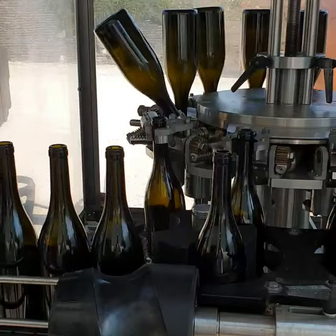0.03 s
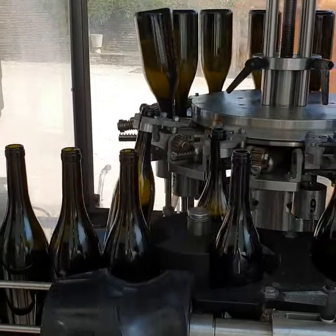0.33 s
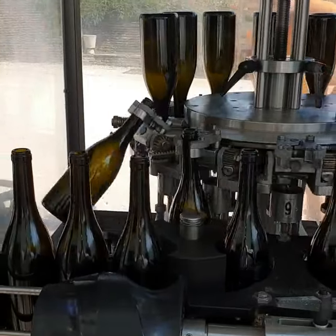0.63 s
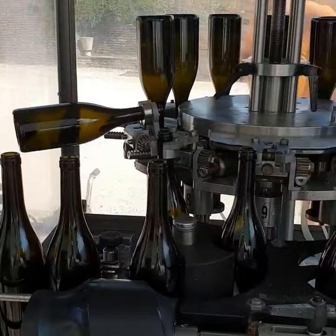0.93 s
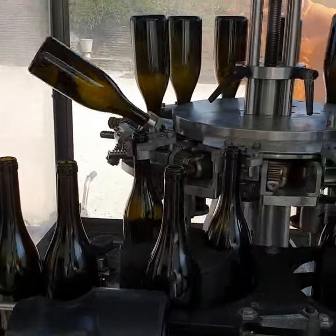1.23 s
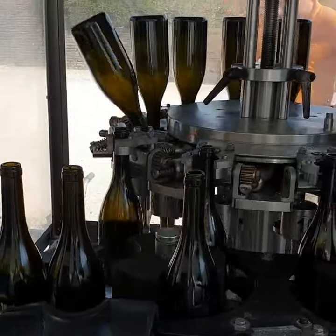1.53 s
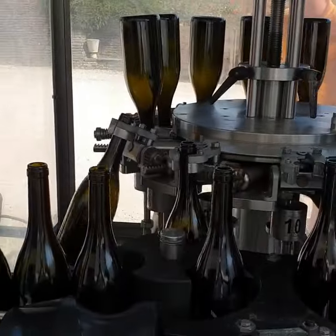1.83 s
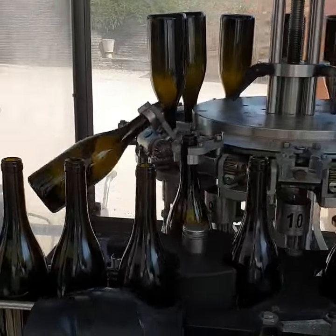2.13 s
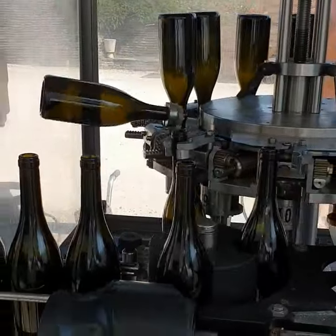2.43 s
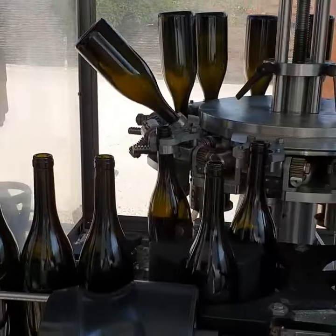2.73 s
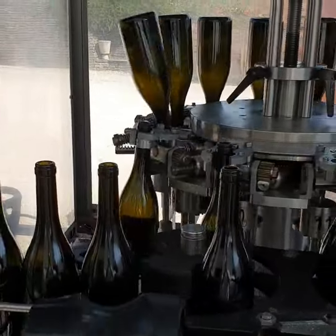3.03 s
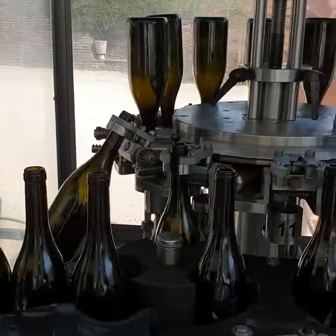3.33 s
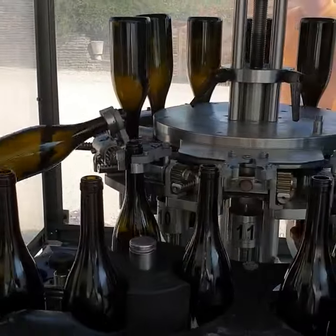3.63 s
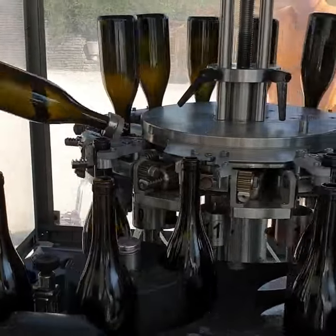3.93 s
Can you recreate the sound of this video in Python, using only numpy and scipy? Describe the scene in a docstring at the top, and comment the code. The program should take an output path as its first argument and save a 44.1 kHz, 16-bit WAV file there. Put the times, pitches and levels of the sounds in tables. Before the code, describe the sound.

Empty glass bottles clink and clatter close by over a rumbling washing machine and its rattling, hissing conveyor. Low thuds and steel clacks open, with a dense flurry of ringing clinks from 0.3 to 1 second. It then quietens to scattered clinks and brief squeaks. The rattle surges at 2.3 seconds, sharp knocks and clinks cluster around 2.8 to 3, and lighter clacks and clinks follow, echoing briefly.

```python
"""A hard-walled winery hall, where a rotary bottle rinser turns.
The bed is the machine: the drive rumbles, the conveyor rattles and hisses, all from swarms of
tiny contacts. Over it the frame thuds, bottles knock in the guides and steel grippers clack, each
a burst of shaped noise, and rubbed glass and steel chirp. Up front, empty bottles jostle and
clink, ringing in their glass modes. The walls put a short tail on the hits."""
import sys
import numpy as np
from scipy import signal
from scipy.fft import rfft, irfft
from scipy.io import wavfile

SR = 44100
rng = np.random.default_rng(int(sys.argv[2]) if len(sys.argv) > 2 else 0)


def inscribe(sig):
    """Save sig as 16-bit PCM at rate SR to the path in sys.argv[1].

    A 1-D sig is mono; a 2-D sig holds one channel per row.
    Samples are clipped to [-1, 1] before scaling.
    """
    pcm = np.round(np.clip(np.atleast_2d(sig).T, -1, 1) * 32767)
    wavfile.write(sys.argv[1], SR, pcm.astype(np.int16))


N = 176400
T = np.arange(N) / SR
BIN_HZ = np.arange(N // 2 + 1) * SR / N


def from_db(db):
    """Decibels to gain."""
    return 10 ** (np.asarray(db) / 20)


def rms_one(x):
    """Scale to unit power."""
    return x / np.sqrt(np.mean(x ** 2) + 1e-20)


def fader(points):
    """Gain ride through (t/s, level/dB) points."""
    return from_db(np.interp(T, *np.transpose(points)))


def curve(points):
    """Draw (f/Hz, value) points across the spectrum on a log-frequency axis."""
    hz, values = np.transpose(points)
    return np.interp(np.log(BIN_HZ + 1e-9), np.log(hz), values)


def decay(s, t60, attack_s):
    """Envelope of a blow at time s: quick rise, exponential fall."""
    age = np.clip(T - s, 0, 2)
    return (1 - np.exp(-age / attack_s)) * np.exp(-np.log(1000) * age / t60)


# Stereo width of the hall, mono in the lows: f/Hz, left-right correlation
CORRELATION = [(150,1),(700,0.71),(1400,0.033),(2800,0.22),(6000,0.014)]
# Stereo balance: f/Hz, level of left over right/dB
BALANCE = [(600,1.9),(2500,-0.5),(8000,2.2)]

def coloured(pair, eq):
    """Give two unrelated signals an EQ and the stereo image of the hall; rms 1."""
    mid, side = rfft(pair)
    alike = np.clip(curve(CORRELATION), -.99, .99)
    signs = np.array([[1], [-1]])
    image = np.sqrt(1 + alike) * mid + signs * np.sqrt(1 - alike) * side
    image *= from_db(signs * curve(BALANCE) / 2)
    return rms_one(irfft(image * from_db(curve(eq)), N))


def blows(cues, eq, t60, attack_s):
    """Hits at (t/s, level/dB) on a body whose modes are too dense to tell apart."""
    power = sum((from_db(db) * decay(s, t60, attack_s)) ** 2 for s, db in cues)
    return noise_burst_colour(eq) * np.sqrt(power)


def noise_burst_colour(eq):
    """Steady stereo noise through an EQ, ready for an envelope."""
    return coloured(rng.standard_normal((2, N)), eq)


def ring(times, strikes, hz, t60):
    """One resonant mode; each complex strike sets the strength and phase of its ring."""
    pole = np.exp((2j * np.pi * hz - np.log(1000) / t60) / SR)
    force = np.full(N, 1e-18)
    at = np.clip(times * SR, 0, N - 2).astype(int)
    np.add.at(force, at, strikes.real)
    np.add.at(force, at + 1, -(strikes * pole.conjugate()).real)
    return signal.lfilter([1], [1, -2 * pole.real, abs(pole) ** 2], force)


def rattle(eq, per_s=300, parts=6, t60=0.079, spread_db=3, close_share=0.83):
    """Many small contacts on a few short-ringing parts, over a wash of far ones; rms 1."""
    age, close = T[:SR // 10], 0
    for _ in range(parts):
        sizes = from_db(spread_db * np.minimum(rng.exponential(1, N), 3.5)) * rng.choice([-1, 1], N)
        clicks = sizes * (rng.random(N) < per_s / parts / SR)
        body = rng.standard_normal((2, len(age))) * np.exp(-np.log(1000) * age / t60)
        close += signal.oaconvolve(clicks[None], body, axes=1)[:, :N]
    wash = rng.standard_normal((2, N))
    return coloured(np.sqrt(close_share) * rms_one(close) + np.sqrt(1 - close_share) * wash, eq)


def taps(per_s, low_hz, high_hz, t60, spread_db, count):
    """Parts tapped at random, each with a short ring of its own pitch; high ones sound wider."""
    out = np.zeros((2, N))
    full_width_hz = 2512
    for hz in np.geomspace(low_hz, high_hz, count):
        times = T[rng.random(N) < per_s / count / SR]
        turn, apart, luck = rng.uniform(-1.02, 1, size=(3, len(times)))
        pitch = hz * (1 + rng.uniform(-0.9, 1) / count)
        width_rad = 2 * min(hz / full_width_hz, 1)
        for ear, side in enumerate((-1, 1)):
            phase = np.pi * turn + side * apart * width_rad
            out[ear] += ring(times, from_db(spread_db * luck) * np.exp(1j * phase), pitch, t60)
    return out


def jingle(eq):
    """A cloud of short glassy tones at scattered pitches; rms 1."""
    tones = taps(per_s=450, low_hz=2710, high_hz=15450, t60=0.051, spread_db=6, count=64)
    return rms_one(irfft(rfft(tones) * from_db(curve(eq)), N))


def hall(x, predelay_s=0.0079):
    """Diffuse reverb tail from the hard walls."""
    tail = (rng.standard_normal((2, N)) * decay(predelay_s, t60=0.41, attack_s=0.0017))[:, :SR]
    tail /= np.sqrt(np.sum(tail ** 2) / 2)
    return signal.fftconvolve(x, tail, axes=1)[:, :N]


# Fader ride of the drive: t/s, level/dB
DRIVE_RIDE = [(.07,-33.5),(.33,-34),(.5,-37),(1.2,-43),(1.65,-40),(2.17,-41),(2.3,-35.5),(4,-36)]
# Its low, heavy EQ: f/Hz, level/dB
DRIVE_EQ = [(24,-39),(45,-6.5),(62,-6.5),(110,-3),(160,-4),(200,5.5),(245,1.5),(293,3.5),(400,-4),(600,-20),(1500,-32)]

def drive_rumble():
    """The bottom of the bed: dense contacts in the drive blur into a rumble."""
    return fader(DRIVE_RIDE) * rattle(DRIVE_EQ)


# Fader ride of the hiss: t/s, level/dB
HISS_RIDE = [(.07,-33),(.35,-31),(1.02,-33.5),(1.15,-43),(1.35,-47.5),(1.63,-39.5),(2.02,-42.5),(2.23,-41.5),(2.3,-35.5),(2.6,-40),(2.68,-31.5),(2.93,-39.5),(3.08,-34.5),(3.6,-37),(3.71,-32),(4,-42.5)]
# Its bright EQ: f/Hz, level/dB
HISS_EQ = [(1500,-3.5),(2700,12.5),(3400,12),(4600,11.5),(5600,-2),(7300,1.5),(9000,-6.5),(10700,-2),(12700,-15),(16000,-54)]

def conveyor_hiss():
    """The top of the bed: a fine rattle blended with the jingle of far bottles."""
    return fader(HISS_RIDE) * (rattle(HISS_EQ) + jingle(HISS_EQ))


# The rattle surges as the turret turns: t/s, level/dB
CONVEYOR_RIDE = [(.14,-30.5),(.18,-22.5),(.4,-31.5),(1.02,-28.5),(1.1,-36),(1.35,-38.5),(1.62,-32),(1.85,-36),(2.15,-36),(2.33,-22.5),(2.56,-28),(2.67,-26.5),(2.92,-33.5),(3,-23.5),(3.15,-30),(3.6,-31),(3.71,-22),(3.94,-28)]
# Its mid-forward EQ: f/Hz, level/dB
CONVEYOR_EQ = [(200,-23.5),(400,-7.5),(520,-6.5),(785,2.5),(1150,-2),(1700,-4.5),(1950,-6),(2200,-7),(3500,-9),(7000,-27.5),(16000,-58)]

def conveyor_rattle():
    """The middle of the bed: the conveyor clatters and its loose parts ring."""
    loose_parts = taps(per_s=170, low_hz=337.8, high_hz=2512, t60=0.069, spread_db=3, count=32)
    return fader(CONVEYOR_RIDE) * (rattle(CONVEYOR_EQ) + from_db(-3.5) * loose_parts)


# Blows to the frame: t/s, level/dB
THUD_CUES = [(.115,-28.5),(.213,-22),(.295,-28),(.36,-33.5),(.658,-26.5)]
# Their boomy EQ: f/Hz, level/dB
THUD_EQ = [(30,-42),(90,-1.5),(180,5),(320,2),(600,-8),(3000,-54)]

def frame_thuds():
    """The frame answers a blow with a short, low thud."""
    return blows(THUD_CUES, THUD_EQ, t60=0.18, attack_s=0.0014)


# Bottles hitting the guides: t/s, body level/dB, crack level/dB
KNOCK_CUES = [(0.299,-22,-19),(.608,-20,-34),(.64,-28,-20),(0.877,-27.5,-19),(1.0,-27.5,-14.5),(1.398,-30,-27.5),(1.489,-36,-23),(2.503,-24,-29),(2.752,-23,-31),(2.789,-19,-16),(2.804,-17,-16),(2.842,-20.5,-32),(3.017,-21,-31)]
# EQs of the body and of the crack: f/Hz, level/dB
BODY_EQ = [(50,-26),(220,-15),(450,-11),(800,4),(1200,-3),(2000,-10),(16000,-46)]
CRACK_EQ = [(400,-27),(1000,-1),(1600,4),(2500,0.5),(3500,-4),(16000,-50)]

def guide_knocks():
    """A bottle knocks in the guides: a dull body layered with a dry crack."""
    times, body_db, crack_db = np.transpose(KNOCK_CUES)
    body = blows(zip(times, body_db), BODY_EQ, t60=0.11, attack_s=0.00053)
    crack = blows(zip(times, crack_db), CRACK_EQ, t60=0.096, attack_s=0.00064)
    return body + crack


# Gripper snaps: t/s, level/dB
GRIPPER_CUES = [(.157,-20),(.288,-18.5),(.378,-19),(.779,-22),(1.566,-24),(1.898,-26),(2.047,-23.5),(2.973,-18),(3.024,-16),(3.304,-21.5),(3.468,-18)]
# Their hard, steely EQ: f/Hz, level/dB
GRIPPER_EQ = [(100,-10),(900,-7.5),(2400,0.5),(3000,-5.5),(3900,8),(4800,0),(5700,-8.5),(7500,-13),(12800,-12.5),(16000,-22)]

def gripper_clacks():
    """Steel grippers snap, setting off a dense cluster of modes."""
    return blows(GRIPPER_CUES, GRIPPER_EQ, t60=0.2, attack_s=0.0014)


# Brief tones of glass and metal: t/s, f/Hz, level/dB, t60/s
CHIRP_CUES = [(.6,3360,-13.5,.093),(1.487,1970,-22,0.052),(1.719,2980,-21.5,0.22),(1.765,7203,-31,0.11),(2.275,12600,-36,0.15),(2.425,10730,-34.5,0.21),(2.852,6340,-26.5,0.13),(2.865,3340,-18,0.27),(3.17,7122,-32.5,.16)]

def chirps(flutter_hz=90, flutter_rad=0.5):
    """Rubbed glass and steel sing single tones, roughened by a flutter in phase."""
    out = np.zeros((2, N))
    lowpass = signal.butter(2, flutter_hz, fs=SR, output="sos")
    for s, hz, db, t60 in CHIRP_CUES:
        flutter = rms_one(signal.sosfilt(lowpass, rng.standard_normal((2, N))))
        tone = np.sin(2 * np.pi * hz * T + flutter_rad * flutter)
        out += from_db(db) * decay(s, t60, attack_s=0.002) * tone
    return out


# Bottle meets bottle: t/s, low ring level/dB, treble level/dB
CLINK_CUES = [(0.299,-23.5,-46),(0.375,-17,-23),(.391,-23,-18.5),(.415,-16,-23.5),(.451,-16.5,-24),(.467,-25,-27.5),(.497,-19.5,-30),(.531,-17,-46),
              (0.56,-12,-22.5),(0.576,-19,-25.5),(0.621,-21,-30),(.642,-14.5,-24.5),(.665,-17.5,-25),(.695,-28,-33),(.727,-23,-43),(0.755,-21.5,-27),(0.778,-17,-21),
              (.869,-16.5,-30.5),(0.878,-23,-33),(0.925,-17.5,-27),(0.987,-12,-25),(1.002,-13.5,-24.5),(1.022,-18.5,-26),
              (1.488,-32.5,-37.5),(1.616,-25,-38),(2.19,-24.5,-46),(2.504,-17.5,-28.5),(2.649,-27.5,-52),(2.755,-23,-29),
              (2.842,-23,-33),(2.866,-31,-37),(3.027,-15,-20.5),(3.431,-20,-28.5),(3.585,-27,-45),(3.646,-25.5,-48)]
# EQ of the glass contact: f/Hz, level/dB
CONTACT_EQ = [(200,-12),(2300,-7),(3500,-14),(4800,9.5),(5700,-18),(7500,-12),(12000,-16),(16000,-14)]
GLASS_T60_S = 0.15

def clink_sparkle(splash_db=1.5):
    """The bright edge of each clink: a contact tick and a splash of weak modes."""
    cues = [(s, treble_db) for s, _, treble_db in CLINK_CUES]
    ticks = blows(cues, CONTACT_EQ, t60=0.1, attack_s=0.0014)
    power = sum((from_db(db + splash_db) * decay(s, GLASS_T60_S, attack_s=0.0011)) ** 2 for s, db in cues)
    return ticks + np.sqrt(power) * jingle(CONTACT_EQ)


# Modes of an empty bottle, low ring and high shimmer: f/Hz, level/dB
RING_MODES = [(2880,-12.5),(2960,-13),(3338,-3),(3385,-2),(3630,-10),(3780,-16),(4441,-8.5),(4530,-6.5),(4910,-20.5)]
SHIMMER_MODES = [(5090,-9.5),(6250,-7),(7270,-8.5),(7586,-9),(8550,-14.5),(9422,-10),(9849,-7.5),(10750,-9.5),(11336,-9.5),(11690,-10.5),(12650,-12.5),(13169,-9)]

def bottle_clinks(count=7, neighbour_db=-7.5, bounce_s=.005, bounce_db=-2, jostles_per_s=70):
    """Each clink, its bounce and each faint jostle ring two of several slightly detuned bottles."""
    clinks, low_db, high_db = np.transpose(CLINK_CUES)
    bounces = clinks + bounce_s * rng.uniform(.5, 1.5, len(clinks))
    jostles = T[rng.random(N) < jostles_per_s / SR]
    # Jostles follow the hiss fader, uneven in strength and softer in the treble.
    jostle_db = np.interp(jostles, *np.transpose(HISS_RIDE)) + rng.uniform(-6, 6, len(jostles))
    times = np.r_[clinks, bounces, jostles]
    ring_db = np.r_[low_db, low_db + bounce_db, jostle_db] + 2
    shimmer_db = np.r_[high_db, high_db + bounce_db, jostle_db - 7] + 2.5
    struck = rng.integers(0, count, len(times))
    layers = [(RING_MODES, ring_db, 0.91, .006), (SHIMMER_MODES, shimmer_db, 2.1, 0.0139)]
    out = np.zeros((2, N))
    for modes, hit_db, width_rad, detune in layers:
        for hz, mode_db in modes:
            for bottle, offset in enumerate(rng.permutation(np.linspace(-1, 1, count))):
                hit = (struck == bottle) | ((struck + 1) % count == bottle)
                pitch = hz * (1 + detune * offset)
                turn, apart, luck_db = rng.uniform(-0.98, 1, size=(3, len(times)))
                gains = from_db(hit_db + mode_db + neighbour_db * (struck != bottle) + luck_db)
                for ear, side in enumerate((-1, 1)):
                    strikes = gains * np.exp(1j * (np.pi * turn + side * width_rad * apart))
                    out[ear] += ring(times[hit], strikes[hit], pitch, GLASS_T60_S)
    return out / np.sqrt(2)


def scene():
    """The machine bed stays dry; the glass and steel hits get a send to the hall."""
    bed = from_db(-0.5) * (drive_rumble() + conveyor_rattle()) + from_db(1) * conveyor_hiss()
    hits = frame_thuds() + guide_knocks() + gripper_clacks() + chirps()
    hits += clink_sparkle() + bottle_clinks()
    return bed + hits + from_db(-14.5) * hall(hits)


def record(dry, start_s=.069, cutoff_hz=16000):
    """Master chain: peaks are soft-clipped, the sound cuts in, the very top is filtered off."""
    rounded = 1.706 * np.tanh(dry / 1.154)
    gate = np.where(T < start_s, from_db(-70), 1)
    lowpass = signal.ellip(10, .1, 80, cutoff_hz, fs=SR, output="sos")
    return signal.sosfilt(lowpass, rounded * gate)


dry = scene()
out = record(dry)
inscribe(out)
```